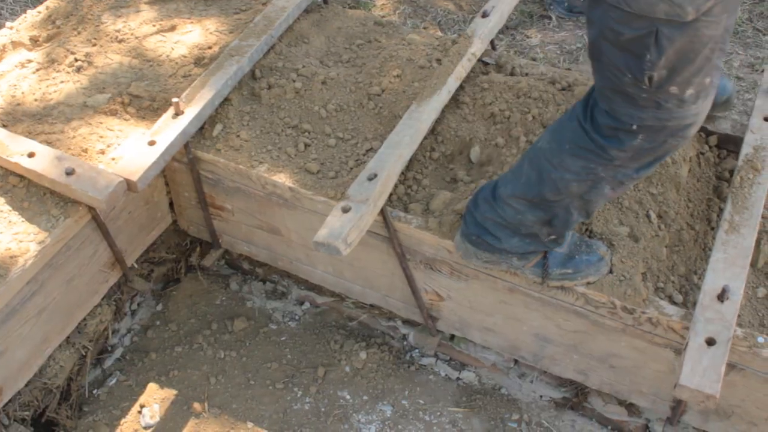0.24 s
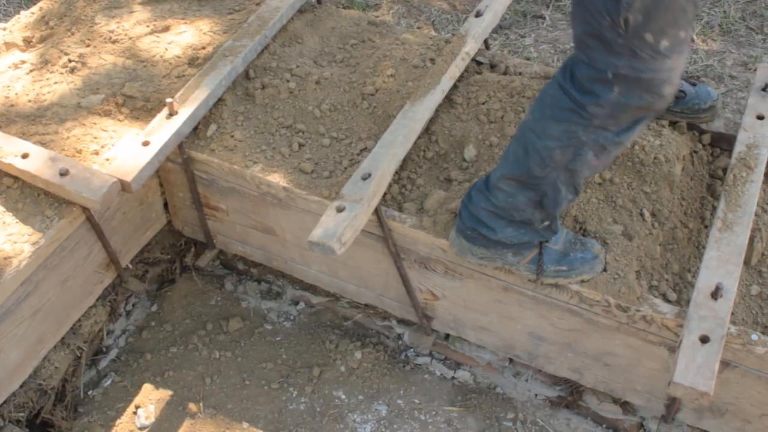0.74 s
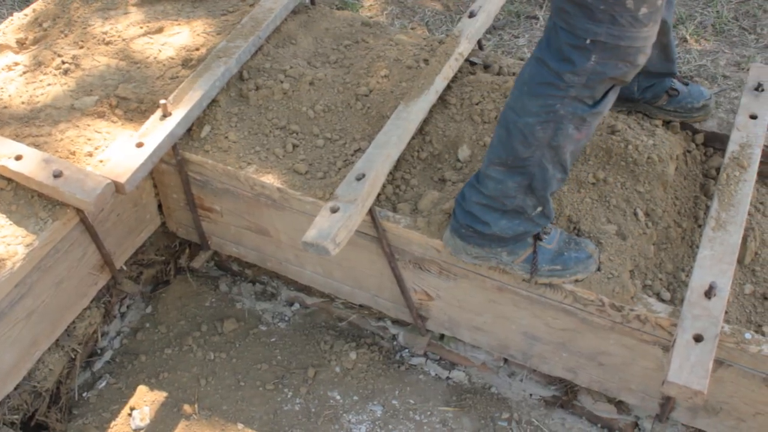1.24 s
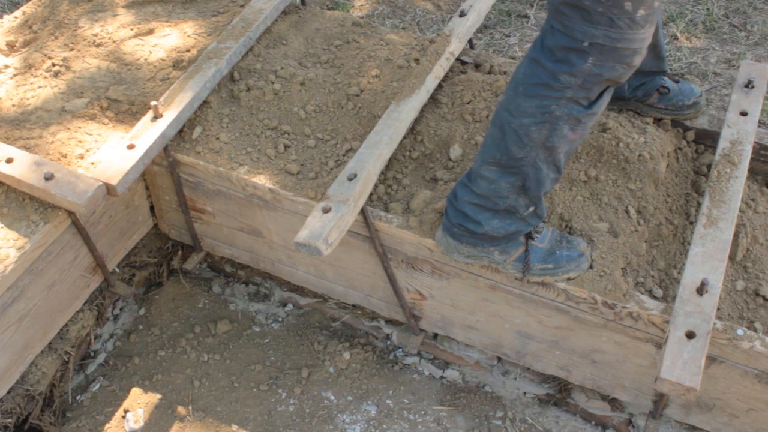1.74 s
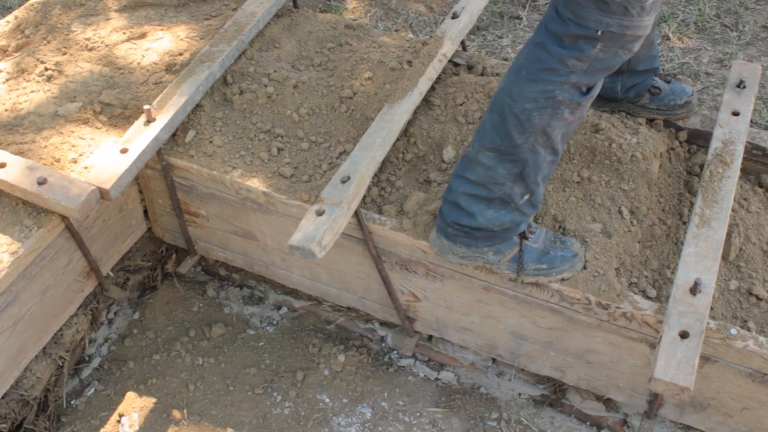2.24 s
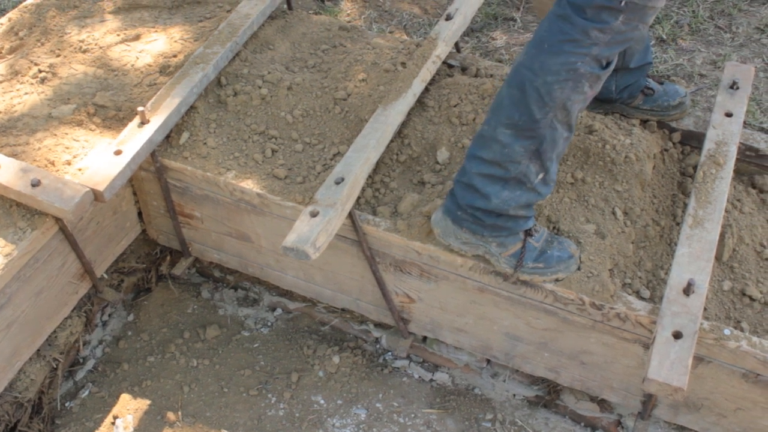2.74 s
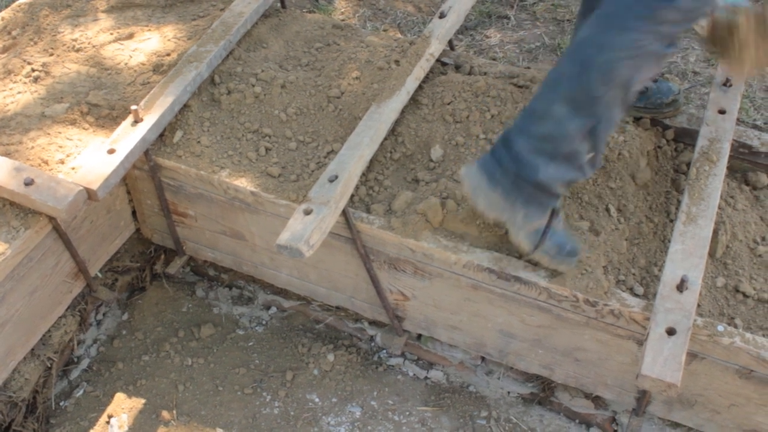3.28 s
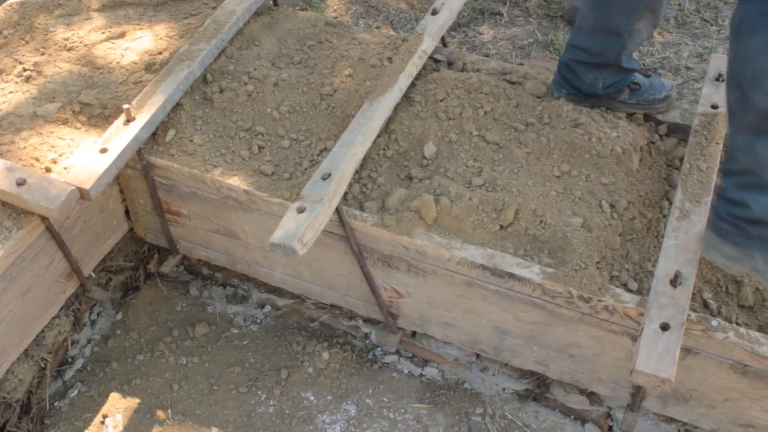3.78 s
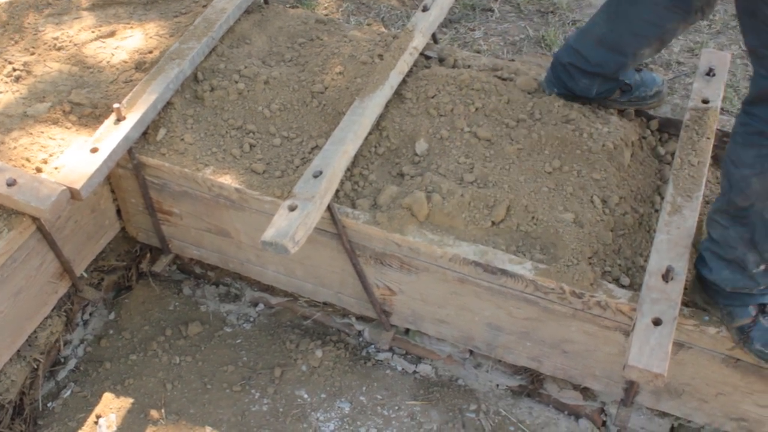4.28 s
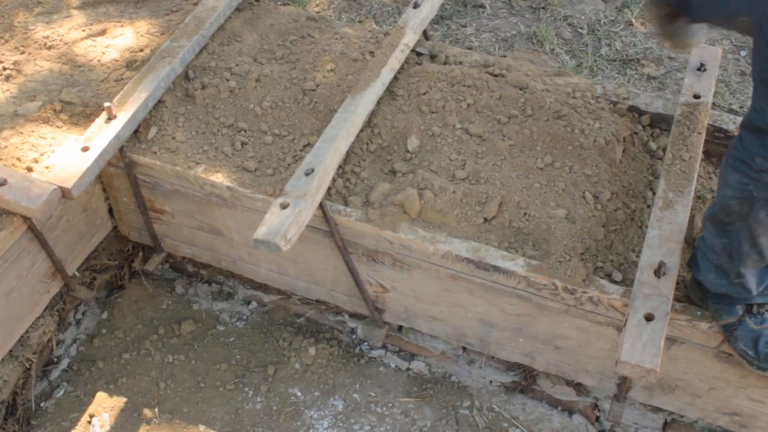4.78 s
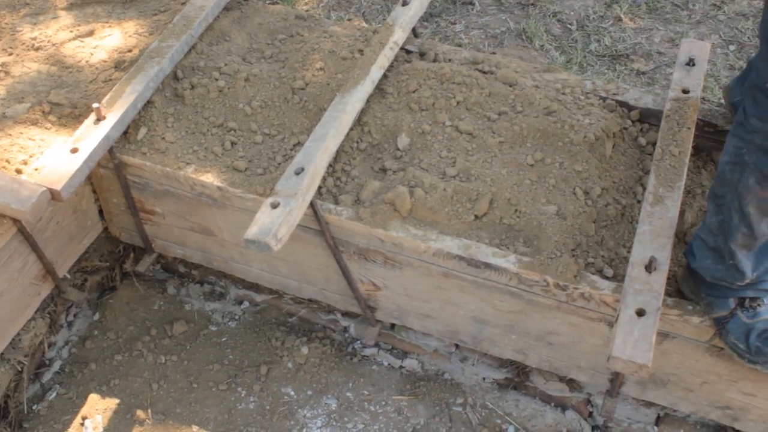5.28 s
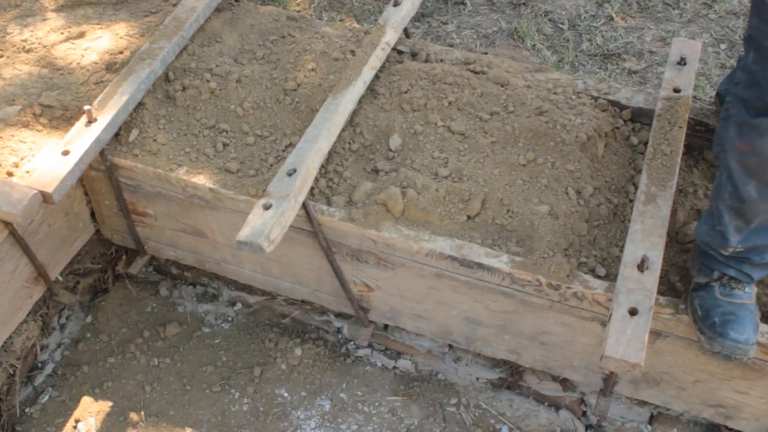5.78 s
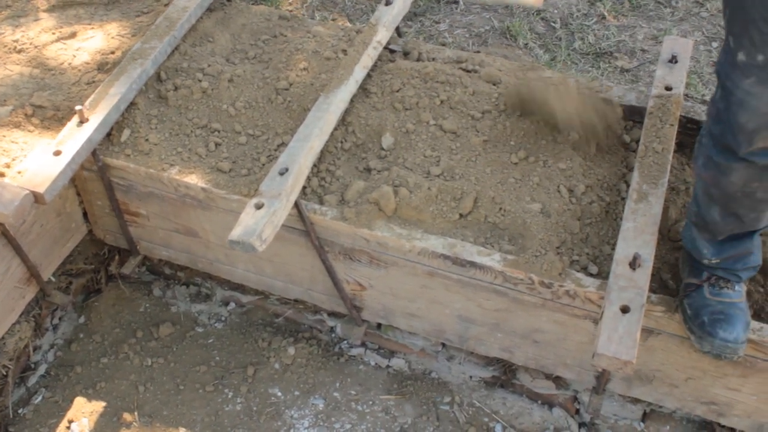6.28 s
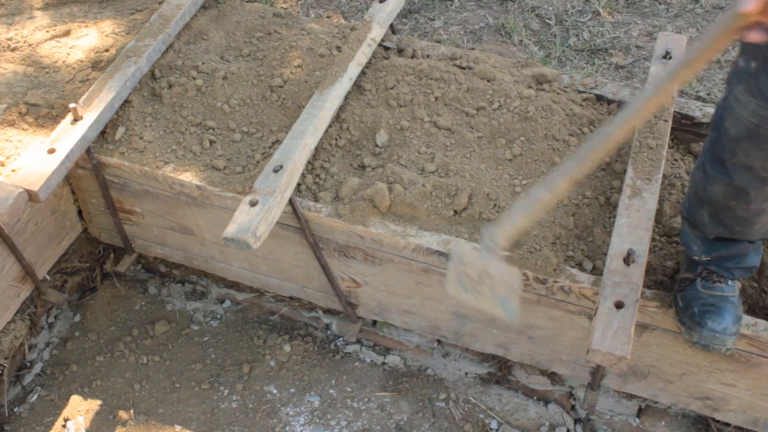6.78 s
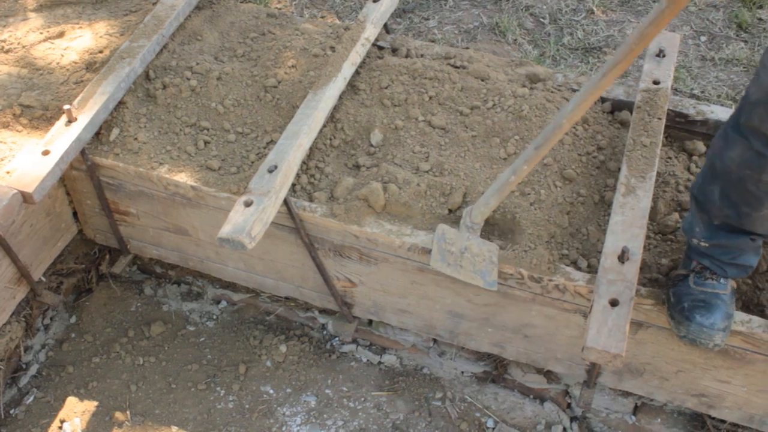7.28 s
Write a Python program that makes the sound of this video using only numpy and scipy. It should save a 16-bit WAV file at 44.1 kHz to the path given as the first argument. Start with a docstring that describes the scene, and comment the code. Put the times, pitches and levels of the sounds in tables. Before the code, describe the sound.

Close by on an outdoor building site, boots and a long-handled steel tool work loose earth inside wooden formwork. A plank judders briefly and a metal rod clinks, then dull thuds and sharp wooden knocks come about once a second. Between them soil pours, crumbles and scrapes over a blade, more busily in the second half. Small birds chirp faintly, light wind bumps the microphone and a far engine revs near the end.

```python
"""Ramming earth in plank formwork

Loose earth is shovelled, trodden and rammed close by on an outdoor site. Blows thump the soil, knock
the planks and ring a tie rod; earth pours and scrapes over a steel blade; a loose plank judders under
a boot. Behind it small birds whistle, a far engine revs and light wind buffets the microphone.
The loudest blows duck the gain and clip."""
import sys
import numpy as np
from scipy import signal
from scipy.fft import rfft, irfft
from scipy.io import wavfile
from scipy.ndimage import uniform_filter1d

SR = 44100
rng = np.random.default_rng(int(sys.argv[2]) if len(sys.argv) > 2 else 0)


def persist_wave(psi):
    """Save psi, clipped to +-1, as 16-bit WAV."""
    counts = np.round(np.clip(psi, -1, 1) * 32767).astype(np.int16)
    wavfile.write(sys.argv[1], SR, np.atleast_2d(counts).T)


N = 331632
T = np.arange(N) / SR
HOP = 32  # samples per step of a coarse gain curve


def undb(db):
    """Decibels to linear gain."""
    return 10 ** (np.asarray(db) / 20)


def unit(x):
    """Scale to rms 1."""
    return x / np.sqrt(np.mean(x ** 2))


def unit_onset(x):
    """Scale to rms 1 over the first 20 ms."""
    return x / np.sqrt(np.mean(x[:SR // 50] ** 2))


def band(x, lo_hz, hi_hz, order=2):
    """Butterworth band-pass."""
    return signal.sosfilt(signal.butter(order, [lo_hz, hi_hz], "band", fs=SR, output="sos"), x)


def ring(x, modes, damping=1):
    """Resonators (f/Hz, level/dB, t60/s) driven by x; damping divides their ring time."""
    out = 0
    for hz, db, t60 in modes:
        r = np.exp(-np.log(1000) * damping / (t60 * SR))
        w = 2 * np.pi * hz / SR
        out = out + undb(db) * signal.lfilter([np.sin(w)], [1, -2 * r * np.cos(w), r * r], x)
    return out


def add(out, s, x):
    """Mix x into out at s seconds."""
    i = int(s * SR)
    out[i:i + len(x)] += x[:N - i]


def smooth(gain):
    """Join a coarse curve up to one value a sample."""
    return np.interp(T, T[::HOP], gain)


def walk(rate):
    """Random modulation: levels held 1 / rate s and slewed twice; spread near 1."""
    hold, count = int(SR / HOP / rate) + 1, len(T[::HOP])
    steps = np.repeat(rng.standard_normal(count // hold + 1), hold)
    return 1.3 * smooth(uniform_filter1d(uniform_filter1d(steps, hold), hold)[:count])


def envelope(s, swell_s, hold_s):
    """Coarse gain that swells to 1, holds and dies away."""
    swell_db, fall_db_per_s = 18, 181
    t = T[::HOP] - s
    db = np.minimum(swell_db * (t / max(swell_s, .002) - 1), fall_db_per_s * (swell_s + hold_s - t))
    return (t >= 0) * undb(np.minimum(db, 0))


def grains(rate, spread_db):
    """Random tiny impacts, many small and few large."""
    out, count = np.zeros(N), int(rate * N / SR)
    sizes = rng.standard_normal(count) * undb(spread_db * np.minimum(rng.exponential(size=count), 5))
    out[rng.integers(0, N, count)] = sizes
    return out


def site():
    """Open-air hush: octave bands that swell together and flicker alone."""
    # tone of the air bed: f/Hz, relative level/dB
    spectrum = [(15, -48), (25, -25), (76, 7.5), (123, -11), (166, 5), (293, -19), (354, 0), (416, -7.5),
                (2990, -14), (7110, -17), (11600, -16.5), (14800, -26), (16000, -27)]
    hz, db = np.transpose(spectrum)
    f = np.fft.rfftfreq(N, 1 / SR) + 1
    hush = rfft(rng.standard_normal(N)) * undb(np.interp(np.log(f), np.log(hz), db))
    out, swell = 0, walk(2.5)
    for centre in 2. ** np.arange(4, 15):
        share = np.clip(1 - abs(np.log2(f / centre)), 0, 1)
        out = out + irfft(hush * share, N) * undb(.8 * swell + 1.5 * walk(10))
    return unit(out) * undb(-50.5)


def wind():
    """Light wind buffets the microphone: a lumpy rumble in gusts and single soft pops."""
    # gusts: t/s, swell/s, hold/s, level/dB
    gusts = [(0.174, 0.06, 0.2, -65), (1.473, 0.36, .1, -66), (2.29, 0.52, .2, -43), (3.307, 0.85, .1, -49),
             (3.8, 0.17, 0.32, -45), (4.389, 0.093, 0.11, -55), (4.878, 0.12, 0.16, -44),
             (5.21, 0.057, 0.063, -35)]
    # wind pops: t/s, level/dB, f/Hz
    pops = [(2.62, -31, 77.4), (2.649, -50, 113), (2.678, -22.5, 122), (2.752, -29, 95), (2.8, -47.5, 71.4),
            (2.884, -32, 94.4), (3.68, -33, 80.7), (3.72, -27.5, 117), (3.889, -21, 222), (4.019, -17, 220),
            (4.061, -21, 139), (4.3, -23, 161), (4.398, -31, 114.5), (4.961, -16.5, 149), (4.98, -15, 156),
            (5.01, -29, 99.6), (5.041, -12.5, 161), (5.072, -21, 107), (5.127, -38, 194), (5.201, -24, 181),
            (5.311, -26, 177), (5.372, -39, 94.2), (6.56, -34, 52), (7.035, -37, 61.9), (7.439, -30, 105)]
    breeze_db = -56.5
    gain = undb(breeze_db) + smooth(sum(undb(db) * envelope(*times) for *times, db in gusts))
    out = gain * undb(4.8 * walk(27)) * unit(band(rng.standard_normal(N), 30, 145))
    for s, db, hz in pops:
        turns = np.arange(0, 2.2, hz / SR)
        add(out, s, undb(db) * np.hanning(len(turns)) * np.sin(2 * np.pi * turns))
    return out


def engine():
    """A far exhaust revs: wavering harmonics of the firing rate fade in and out."""
    # rev curve: t/s, firing rate/Hz, level/dB
    revs = [(5.7, 32.3, -65), (5.92, 35.4, -47), (6.042, 36.4, -51), (6.134, 38, -39.5), (6.544, 48.5, -41),
            (6.736, 50.5, -40), (6.878, 50.5, -46), (7.2, 47.5, -41), (7.6, 44, -42)]
    # firing rate and its multiples: level/dB
    orders_db = [-4.5, -4, -9]
    s, hz, db = np.transpose(revs)
    phase = 2 * np.pi * np.cumsum(np.interp(T, s, hz) * (1 + 0.02 * walk(86))) / SR
    fade = np.clip(np.minimum(T - s[0], s[-1] - T) / 0.089, 0, 1)
    drone = sum(undb(level + 2.9 * walk(15)) * np.sin(k * phase) for k, level in enumerate(orders_db, 1))
    return fade * undb(np.interp(T, s, db)) * drone


def birds():
    """Gliding near-sine whistles, smeared by echoes off nearby trees."""
    # clear notes: t/s, length/s, turn/share of length, first f/Hz, turn f/Hz, last f/Hz, level/dB
    clear = [(.11, 0.19, 0.4, 2840, 2770, 2780, -61), (0.872, .1, .5, 2950, 2950, 2950, -61),
             (1.808, 0.063, 0.2, 3340, 3340, 3280, -47), (1.989, 0.087, 0.7, 3220, 3250, 3240, -50),
             (2.947, 0.0035, 0.6, 4700, 4234, 3780, -108), (2.987, 0.04, 0.25, 3950, 5350, 3700, -47),
             (3.147, 0.045, 0.54, 3960, 5230, 3780, -48), (3.335, .014, .5, 4300, 3950, 3700, -59),
             (3.416, .038, 0.2, 3290, 3330, 4650, -46.5), (3.465, 0.036, 0.3, 4250, 3230, 2510, -43),
             (3.574, 0.037, 0.5, 3230, 3450, 4140, -45), (3.632, 0.043, 0.27, 4360, 3210, 2570, -41),
             (3.695, 0.034, 0.25, 3100, 3170, 3100, -44), (3.763, 0.041, 0.44, 3300, 3450, 4460, -42),
             (3.826, 0.023, 0.6, 2990, 2880, 2600, -38), (4.16, 0.054, 0.43, 4440, 3780, 2800, -37),
             (4.341, 0.18, 0.8, 2240, 2210, 2180, -50), (6.3, 0.018, 0.48, 4700, 4270, 3800, -47),
             (6.402, .05, 0.43, 5150, 5040, 3840, -43), (6.477, .055, 0.5, 6200, 5060, 4900, -48),
             (6.548, 0.06, 0.4, 5120, 5100, 3700, -45), (6.616, 0.083, .5, 5300, 5100, 5100, -56),
             (6.709, 0.03, .5, 5180, 4950, 4740, -44)]
    # hoarse notes of a farther bird: same columns
    hoarse = [(4.341, 0.16, 0.53, 2220, 2180, 2150, -61), (1.551, .12, .5, 3850, 4070, 4150, -56),
              (1.58, .1, .5, 4330, 4550, 4600, -53), (1.68, 0.26, .5, 4550, 4600, 4700, -55),
              (6.2, .13, 0.72, 4250, 4940, 5170, -54), (7.172, 0.093, 0.41, 6600, 5340, 4730, -50)]
    clear_depth, hoarse_depth = .007, .018  # warble as a share of the pitch
    notes = [(*note, clear_depth) for note in clear] + [(*note, hoarse_depth) for note in hoarse]
    song, warble = np.zeros(N), walk(300)
    for s, length, turn, *hz, db, depth in notes:
        u = np.arange(0, 1, 1 / (length * SR))
        glide = np.interp(u, [0, np.clip(turn, .1, .9), 1], hz)
        pitch = glide * (1 + depth * warble[int(s * SR):][:len(u)])
        whistle = np.sin(2 * np.pi * np.cumsum(pitch) / SR)
        add(song, s, undb(db) * signal.windows.tukey(len(u), .25) * whistle)
    t = T[:SR // 5]
    echoes = .013 * rng.standard_normal(len(t)) * np.exp(-t / .055)
    direct = 0.75 * song * undb(2.5 * walk(220))
    return direct + signal.fftconvolve(song, echoes)[:N]


def judder():
    """A loose plank sticks and slips under a boot: uneven knocks, with lumps shaken along."""
    start_s, swell_s, hold_s, slips_per_s = 0.495, 0.033, 0.0573, 95
    turns = np.cumsum(slips_per_s * (1 + 0.18 * walk(90))) / SR
    slips = np.diff(np.floor(turns), prepend=0) * undb(1.2 * rng.standard_normal(N))
    knocks = slips + 0.38 * grains(470, 1.5)
    plank = ring(knocks, [(200, -5, 0.028), (302, 8.5, 0.03), (464, -1.5, 0.0079), (1010, -8, 0.027)])
    body, clicks = unit(band(plank, 137, 1350)), unit(band(knocks, 1500, 7900))
    stop = np.exp(-np.maximum(T - start_s - swell_s - hold_s, 0) / 0.0037)
    return undb(-14.5) * smooth(envelope(start_s, swell_s, hold_s)) * stop * (body + 0.016 * clicks)


def flow():
    """Moving earth rides five faders: lumps, crumbs, sand, dust and blade scrape."""
    # slides, pours and scrapes: t/s, swell/s, hold/s, lumps/dB, crumbs/dB, sand/dB, dust/dB, blade/dB
    moves = [(0.0, 0.0028, 0.034, -46.5, -54, -56, -62, -80), (0.25, 0.028, 0.11, -65, -67, -52, -52, -90),
             (0.376, .04, 0.055, -27, -50, -50, -54, -85), (0.51, 0.024, 0.039, -20.5, -43, -53, -58, -80),
             (0.59, 0.017, 0.036, -58, -43, -56, -58, -80), (0.856, .004, 0.0055, -68, -74, -49, -47, -77),
             (0.946, 0.022, 0.049, -62, -67, -50.5, -61, -90),
             (1.04, .01, 0.037, -58, -55, -51.5, -63, -65), (1.176, 0.21, 0.02, -50, -37, -58, -58, -92),
             (1.18, 0.05, 0.18, -43.5, -56.5, -54, -51.5, -90),
             (1.428, 0.0079, 0.023, -44, -50, -75, -77, -71),
             (1.547, 0.055, 0.28, -76, -58, -59.5, -80, -83),
             (1.863, 0.011, 0.017, -49, -55, -48, -52.5, -63),
             (1.893, 0.033, 0.0037, -44, -45, -44, -46.5, -58),
             (1.998, .03, 0.045, -70, -61, -48.5, -47, -70), (2.075, 0.026, 0.014, -33, -42, -57, -53, -44),
             (2.122, 0.011, 0.0091, -45, -43.5, -55, -45, -37),
             (2.198, 0.023, 0.13, -49, -47, -42, -47, -66),
             (2.365, 0.053, 0.055, -38, -39, -41.5, -48, -57),
             (2.493, 0.035, 0.1, -64, -52, -50.5, -56, -66),
             (2.76, 0.025, 0.028, -66, -44, -44.5, -52, -80),
             (3.06, 0.0068, 0.026, -32.5, -42, -57, -56, -78),
             (3.22, 0.027, 0.0092, -82, -59, -48, -51, -88),
             (3.284, 0.013, 0.099, -46.5, -47.5, -75, -77, -78),
             (3.586, 0.016, 0.2, -58, -52.5, -50.5, -51, -69),
             (3.822, 0.17, 0.16, -38.5, -35, -44, -44.5, -36.5),
             (3.888, 0.0025, .003, -49, -71, -52, -51, -61), (3.92, .003, .003, -60, -70, -59, -64, -61),
             (4.196, 0.012, 0.11, -47, -40.5, -48, -49.5, -62),
             (4.46, 0.011, 0.06, -58, -50, -69, -60, -74), (4.557, 0.096, 0.1, -38.5, -36, -42.5, -43, -69),
             (4.82, 0.0091, 0.033, -50, -68, -73, -55, -54),
             (4.894, 0.013, 0.25, -40.5, -46.5, -46, -49.5, -48.5),
             (5.136, 0.0097, 0.039, -39, -46, -88, -83, -72),
             (5.27, 0.0082, 0.031, -49, -48.5, -69, -71, -80),
             (5.378, 0.023, 0.13, -38, -48, -51.5, -57, -68),
             (5.523, 0.044, 0.17, -50.5, -44.5, -49.5, -48.5, -40.5),
             (5.724, 0.031, 0.26, -42.5, -39, -44.5, -47, -43),
             (6.055, 0.012, 0.079, -50, -47.5, -57, -62, -55),
             (6.19, 0.13, 0.44, -58.5, -48.5, -54, -57, -55),
             (6.22, 0.0089, 0.058, -47.5, -55, -75, -76, -83),
             (6.723, 0.091, 0.09, -34.5, -33.5, -41.5, -44, -39),
             (6.936, 0.053, 0.061, -36.5, -33, -41.5, -47.5, -36.5),
             (7.257, 0.12, 0.039, -35.5, -36.5, -49, -44, -37),
             (7.402, 0.063, .08, -29.5, -31.5, -59, -48, -46)]
    gains = sum(np.outer(undb(db), envelope(s, swell_s, hold_s)) for s, swell_s, hold_s, *db in moves)
    return map(smooth, gains)


def patter(lo_hz, hi_hz, rate, cycles, count):
    """Grains of many sizes, each size ringing at its own pitch for some cycles."""
    out = 0
    for hz in np.geomspace(lo_hz, hi_hz, count) * (1 + 0.048 * rng.standard_normal(count)):
        ticks = ring(grains(rate, 2.2), [(hz, 0, cycles / hz)])
        out = out + unit(ticks) * undb(1.8 * walk(25))
    return unit(out)


def earth(lumps_gain, crumbs_gain, sand_gain, dust_gain):
    """Lumps drum on the planks, crumbs patter, sand and dust hiss; the flow comes in spurts."""
    spurt = walk(45)
    drumming = ring(grains(350, 2.65), [(167, 5.7, 0.31), (242, 17.6, 0.037), (321, 19.5, 0.047)])
    lumps = unit(band(drumming, 160, 356))
    crumbs = patter(500, 3000, rate=240, cycles=44, count=14)
    crumbs += .65 * unit(band(grains(3000, 2.2), 500, 2600))
    fine = grains(7000, 1.9)
    sand, dust = unit(band(fine, 2280, 6500)), unit(band(fine, 9600, 13900))
    return (lumps * lumps_gain * undb(3.3 * spurt)
            + crumbs * crumbs_gain * undb(1.2 * spurt)
            + (sand * sand_gain + dust * dust_gain) * undb(1.6 * spurt + 1.6 * walk(70)))


def steel(scrape_gain):
    """Struck rod and blade ring and buzz; sliding grit makes the blade sing in shifting modes."""
    # hits on the tie rod: t/s, level/dB, free ring/s
    rod_hits = [(1.0003, -16, .036), (1.034, -32.5, .12)]
    # tie rod modes: f/Hz, level/dB, t60/s
    rod_modes = [(1590, -5, 0.063), (2060, -7, 0.13), (2700, 1, 0.049), (2850, -4, 0.034),
                 (3220, -11, 0.047), (3870, -16, 0.26), (3740, 5.5, 0.099), (4430, -14, 0.039),
                 (4800, -8, .07), (4960, -6, 0.094), (5670, -11, 0.093), (5830, -6.5, 0.054),
                 (7200, -19, 0.11), (7150, -20, 0.05), (7570, -13, 0.065), (8300, -9, 0.045),
                 (8900, -19, .03), (10480, -13, 0.065), (10980, -21, .05)]
    # hits on the shovel blade: t/s, level/dB
    blade_hits = [(2.773, -32), (3.069, -35), (4.212, -38)]
    # modes of the free blade: f/Hz, level/dB, t60/s
    blade_modes = [(1034, 6.5, 0.1), (2100, -18, 0.87), (2090, -29, .6), (2350, -24, 0.2),
                   (2640, -23, 0.34), (2860, -25, 0.25), (3000, -17, 0.12), (3380, -14, 0.2),
                   (4270, -6.5, 0.36), (4810, -3, 0.15), (5530, -1.5, 0.18), (6250, 4, 0.097),
                   (7730, 6, 0.086), (8300, 6, 0.1), (10000, -12, .06)]
    choked_t60_s, buzz_db = .1, 2.5  # a rod that touches earth again stops fast; loose steel buzzes
    struck, tap, t = np.zeros(N), signal.unit_impulse(SR), T[:SR]
    for s, db, free_s in rod_hits:
        chatter = tap + .04 * rng.standard_normal(SR) * np.exp(-t / .006)
        choke_db = 60 * np.maximum(t - free_s, 0) / choked_t60_s
        add(struck, s, undb(db - choke_db) * ring(chatter, rod_modes))
    thud = np.convolve(tap, np.hanning(16) / 4)  # a clod pushes longer than steel, favouring low modes
    for s, db in blade_hits:
        add(struck, s, undb(db) * ring(thud, blade_modes))
    scratch = grains(1800, 2.5) * undb(3 * walk(60))
    singing = 0
    for hz, db, t60 in blade_modes:
        rolloff_db = 14 * max(np.log2(hz / 4600), 0)
        tone = ring(scratch, [(hz, db - rolloff_db, t60)], damping=6)
        bent = np.interp(T + .0011 * walk(12), T, tone)  # the load bends each pitch its own way
        singing = singing + bent * undb(4.5 * walk(30))
    return struck * undb(buzz_db * walk(150)) + scrape_gain * unit(singing)


def blows():
    """Rammer, boots and clods land: the soil thumps, planks knock, grit cracks and trickles."""
    # blows: t/s, level/dB, thump f/Hz, thump/dB, knock f/Hz, knock/dB, crack/dB, ring length/ratio
    hits = [(0.045, -29, 276, -6, 646, -21, -37, 1), (0.285, -39, 268, -5, 494, -22, -26, 1),
            (0.382, -2, 181.6, -3, 597, -26.5, -48, 1), (0.461, 5, 470, -19.5, 1240, -7, -24, 0.73),
            (0.564, -22.5, 300, -7, 895, -11, -13.5, 2.5), (0.858, -39, 109.7, -27, 850, -19, -13, 23),
            (1, -3, 460, -48, 617, -6.5, -13.5, 0.9), (1.036, -8, 277, -22, 830, -14.5, -15.5, 2),
            (1.169, -35.5, 445, -9, 620, -20, -17, 6), (1.186, -31.5, 366, -4, 565, -13, -30, 3),
            (1.409, -9.5, 296, -9, 796, -12.5, -26, 2.1), (1.432, -1.5, 278, -15, 1200, -3.5, -17.5, 0.56),
            (1.676, -31.5, 174, 0.5, 676, -6, -29, 9), (1.816, -18.5, 304, -6, 560, -28.5, -24, 1.14),
            (1.957, -31.5, 259, -4.5, 482, -27, -18, 0.5), (2.102, -24.5, 357, -6.5, 465, -27, -15, 2.5),
            (2.137, -28, 180, -10, 1580, -5.5, -29, 5), (2.345, 2.5, 287, -20, 1110, -3.5, -21, 0.6),
            (2.38, -20.5, 182, -23, 1020, -5.5, -38, 3.5), (2.456, -17.5, 396, -35, 680, -3, -1, 0.74),
            (2.468, -10.5, 260, -11.5, 530, -5, -29, 1.4), (2.718, -30.5, 320, -42, 607, -13, -25, 1),
            (2.773, -2, 501, -20.5, 1730, -15, -15, 0.82), (3.038, -33, 280, -51.5, 890, -13, -18, 5),
            (3.068, -10, 317, -11.5, 2020, -9.5, -36, 0.7), (3.121, -25, 245, -7, 503, -29, -33, 0),
            (3.278, -4.5, 419, -4.5, 1460, -0.5, -33, 0.5), (3.318, -22, 188, -18, 1130, -11.5, -41, 2.5),
            (3.333, -26.5, 200, -32, 1520, -11, -42, 4), (3.387, -38.5, 454, -15, 476, -3, -36, 1),
            (3.466, -38, 490, -14.5, 1300, -11.5, -35, 1.5), (3.509, -39.5, 500, -30, 1500, -10, -40, 2),
            (3.609, -13.5, 341, -10, 1940, -15.5, -45, 1.5), (3.813, -15.5, 203, -9, 590, -19, -28.5, 1.3),
            (3.859, -15, 212, -11, 740, -21.5, -24.5, 2.1), (3.955, -16, 139, -5, 1080, -36, -30, 1),
            (3.979, -14.5, 262, -1.5, 860, -13, -36, 1.5), (4.013, -26.5, 245, -16, 1490, -7.5, -30, 1),
            (4.119, -20.5, 262, -9.5, 660, -10, -44, 3), (4.21, 4.5, 244, -18, 437, -16, -26.5, 1.02),
            (4.463, -20.5, 356, -5, 606, -14.5, -67, 1.6), (4.571, -28, 362, -4.5, 545, -16, -22, 2.5),
            (4.652, -22.5, 355, -9, 1050, -15, -29, 3.7), (4.749, -21, 307, -7, 1080, -10, -34, 4.2),
            (4.801, -11, 379, -6, 695, -19, -38, 2), (4.938, -20, 379, -8, 674, -10, -33, 3.5),
            (5.137, -30, 293, -19, 1200, -18, -10, 3), (5.147, -3, 275, -11, 880, -4.5, -21.5, 0.48),
            (5.267, -12, 348.3, -4.5, 686, -13.5, -37, 1.5), (5.468, -16, 352, -12, 1360, -14, -37, 1.5),
            (5.5, -26.5, 342, -27, 1260, -6, -40, 3), (5.518, -12, 375, -11, 760, -17.5, -25.5, 2.5),
            (5.669, -26.5, 242, -15, 660, -12.5, -22, 2), (5.717, -40, 333, -24, 670, -21, -3, 5),
            (5.763, -25, 188, -20, 1025, -7, -28, 2), (5.782, -15.5, 200, -20, 900, -14, -39, 3.5),
            (5.96, -27.5, 297, -4, 1230, -7.5, -32, 2.5), (5.885, -23, 294, -7.5, 1240, -14.5, -22, 3),
            (6.023, -21, 304, -6, 2400, -8, -24, 5), (6.034, -10, 330, -9, 626, -4.5, -16, 0.8),
            (6.068, -24, 181, -11.5, 1150, -8.5, -39, 2.2), (6.444, -43.5, 300, -30, 5030, -6, -6, 2.5),
            (6.691, -20, 333, -7, 690, -13.5, -41, 2), (6.743, -15.5, 191, -15, 1050, -17, -25, 3),
            (6.783, -17, 303, -25, 1590, -18.5, -19.5, 2), (6.847, -12.5, 321, -26, 1310, -14, -28, 1),
            (6.859, -20, 294.5, -26, 2280, -9, -33, 2.5), (6.875, -13, 305, -26, 1550, -11.5, -38, 4),
            (6.9, 2, 410, -30, 703, -5, -28, 1.04), (6.913, -16, 280, -4.5, 766, -4.5, -23, 0.4),
            (6.941, -17, 256, -12.5, 2540, -12.5, -38, 1), (6.99, -27, 300, -23, 1200, -4.5, -28, 6),
            (7.247, -14, 339, -5, 976, -19.5, -36, 2.2), (7.418, -29.5, 336, -2.5, 1050, -2.5, -4, 5)]
    # plank modes: f/Hz, level/dB, t60/s before each blow's damping
    planks = [(720, -37, 0.0094), (1235, 12, 0.0057), (1690, -15, 0.017), (2190, -14, 0.049),
              (2360, -2, 0.019), (2734, -26.5, 0.091), (3155, -29.5, 0.038), (3840, -2, 0.019),
              (4600, -34, 0.019), (4536, -58, 0.021)]
    scatter_db = 2.5  # plank modes differ from blow to blow
    out, t = np.zeros(N), T[:SR // 6]
    for s, db, thump_hz, thump_db, knock_hz, knock_db, crack_db, length in hits:
        crush, grit, chance = rng.standard_normal((3, len(t)))
        damping = 1 / np.clip(length, .2, 3)
        age = t * damping
        # yielding earth takes a moment to stop the blow
        rise = 1 - np.exp(-(t / (0.00085 + .0003 / damping)) ** 2)
        # the soil rings low and short, roughened by settling lumps
        settling = 0.46 * unit(band(crush, .5 * thump_hz, 1.275 * thump_hz)) * np.exp(-age / 0.015)
        thump = rise * (np.sin(2 * np.pi * thump_hz * t) * np.exp(-age / 0.0087) + settling)
        # the spot that is hit favours plank modes near its own pitch
        modes = [(hz, level + scatter_db * luck - 5 * abs(np.log2(hz / knock_hz)), t60)
                 for (hz, level, t60), luck in zip(planks, chance)]
        wood = ring(crush * rise * np.exp(-age / 0.0042), modes + [(knock_hz, 6, .019)], 1.5 * damping)
        crunch = unit(band(grit, knock_hz / 1.67, knock_hz * 1.384))
        crunch *= 0.5 * np.exp(-age / 0.0032) + 0.012 * np.exp(-age / 0.046)
        knock = wood / np.abs(wood).max() + rise * crunch
        crack = unit(band(grit, 810, 2700, order=1))
        crack *= rise * (np.exp(-age / 0.002) + 0.041 * np.exp(-age / 0.018))
        blow = (undb(thump_db) * unit_onset(thump) + undb(knock_db) * unit_onset(knock)
                + undb(crack_db) * unit_onset(crack))
        add(out, s, undb(db) * band(blow, .62 * thump_hz, 19000, order=3))
    return out


def form_booms():
    """The heaviest blows shake the whole packed form."""
    # booms: t/s, level/dB
    booms = [(1.431, -24), (2.347, -29), (3.28, -24.5), (4.208, -14), (5.146, -18.5), (6.035, -18),
             (6.901, -25.5)]
    # modes of the packed form: f/Hz, level/dB, t60/s
    form_modes = [(133, -5, 0.072), (68, -12.5, .06)]
    push = np.append(np.diff(np.hanning(SR // 150)), np.zeros(SR // 6))
    out, boom = np.zeros(N), unit_onset(ring(push, form_modes))
    for s, db in booms:
        add(out, s, undb(db) * boom)
    return out


def scene():
    """Mono mix of the close work over the outdoor background."""
    *soil_gains, scrape_gain = flow()
    work = blows() + form_booms() + steel(scrape_gain) + earth(*soil_gains) + judder()
    return (work + birds() + engine() + wind() + site())[None]


def record(dry):
    """Microphone bass cut, gain control that ducks after loud blows, hard clip, rumble and top cut."""
    bass_hz, rumble_hz, top_hz = 42.3, 10, 15900
    duck_from_db, duck_power, duck_lags_s, ceiling = -31, 0.29, (0.046, 0.12), .59
    heard = signal.sosfilt(signal.butter(2, bass_hz, "high", fs=SR, output="sos"), dry)
    loudness = np.minimum(abs(heard), 1)
    for lag_s in duck_lags_s:
        step = 1 / (lag_s * SR)
        loudness = signal.lfilter([step], [1, step - 1], loudness)
    ducked = heard * (1 + (loudness / undb(duck_from_db)) ** 2) ** (-duck_power / 2)
    clipped = np.clip(ducked, -ceiling, ceiling)
    coupled = signal.sosfilt(signal.butter(1, rumble_hz, "high", fs=SR, output="sos"), clipped)
    return signal.sosfilt(signal.ellip(10, .2, 70, top_hz, fs=SR, output="sos"), coupled)


dry = scene()
out = record(dry)
persist_wave(out)
```